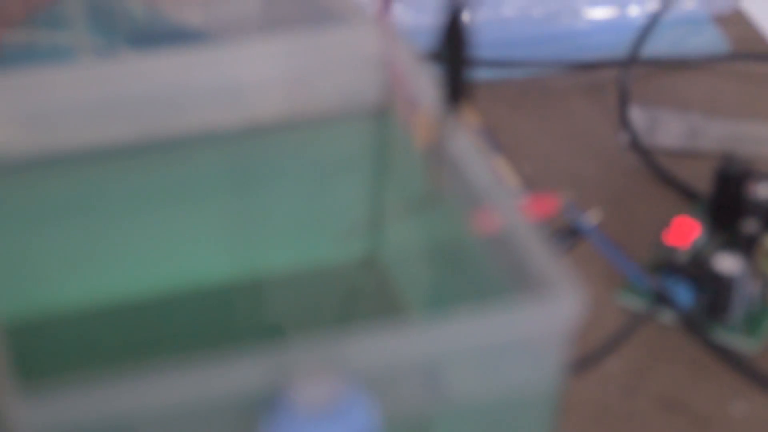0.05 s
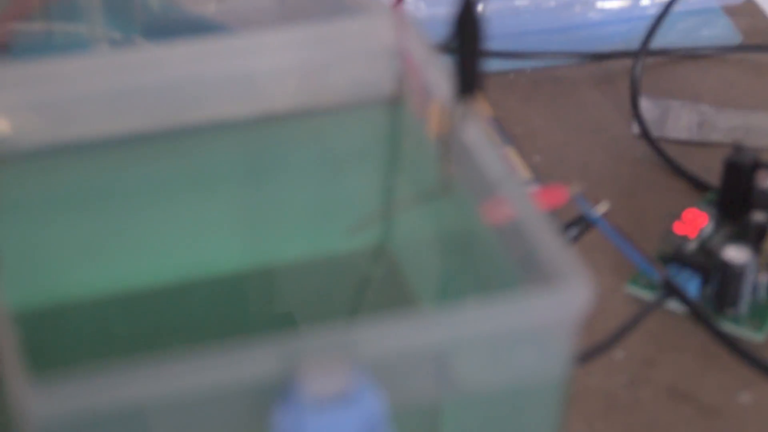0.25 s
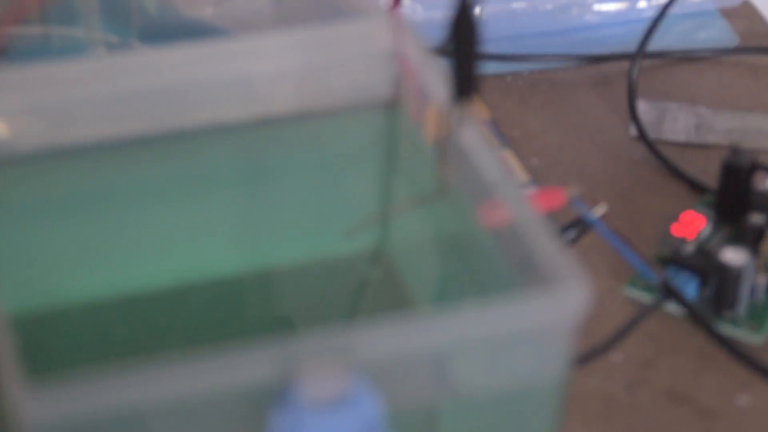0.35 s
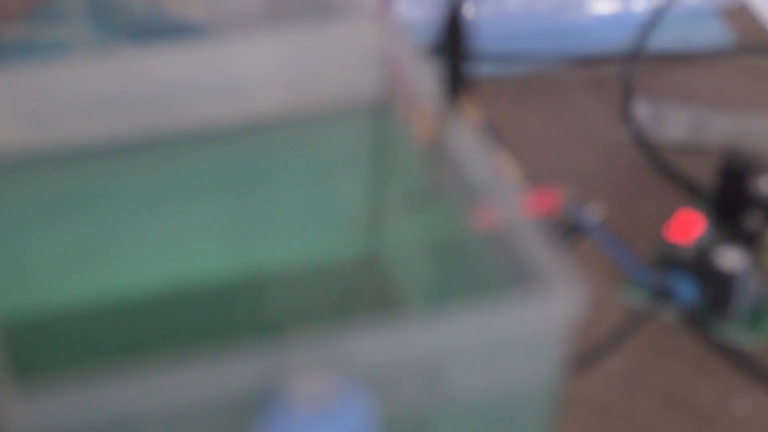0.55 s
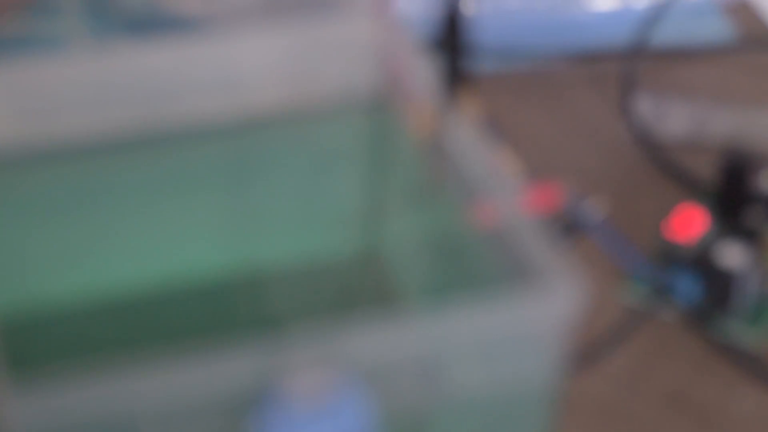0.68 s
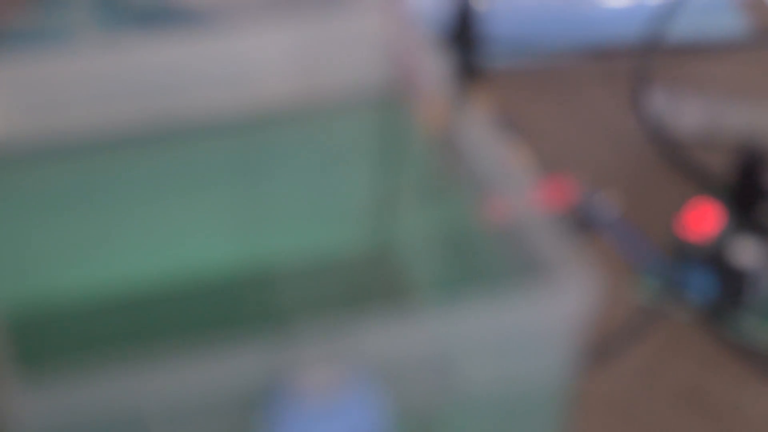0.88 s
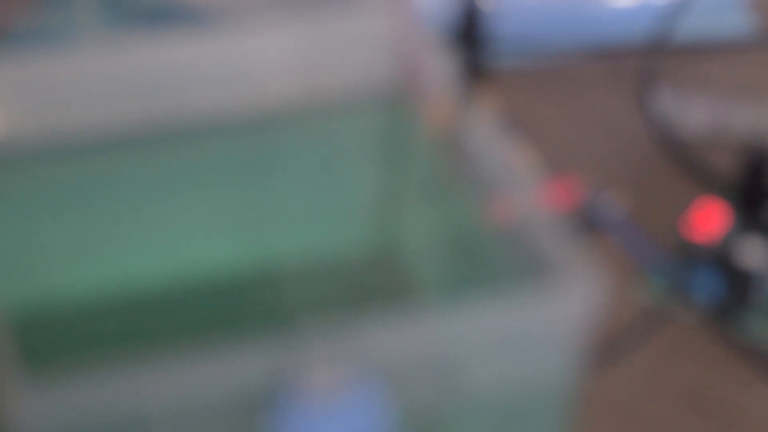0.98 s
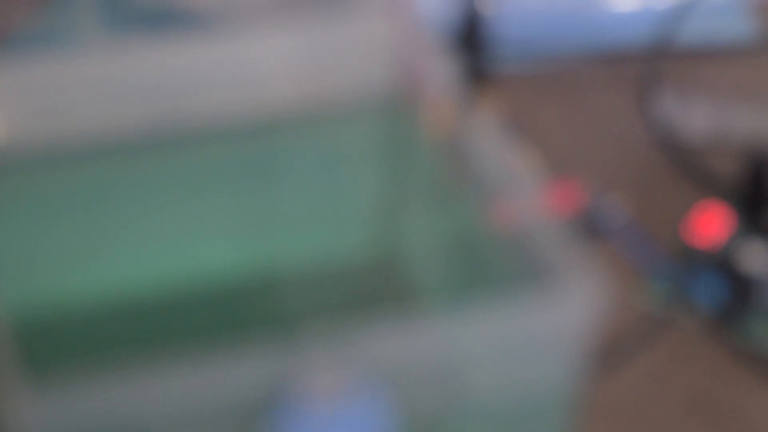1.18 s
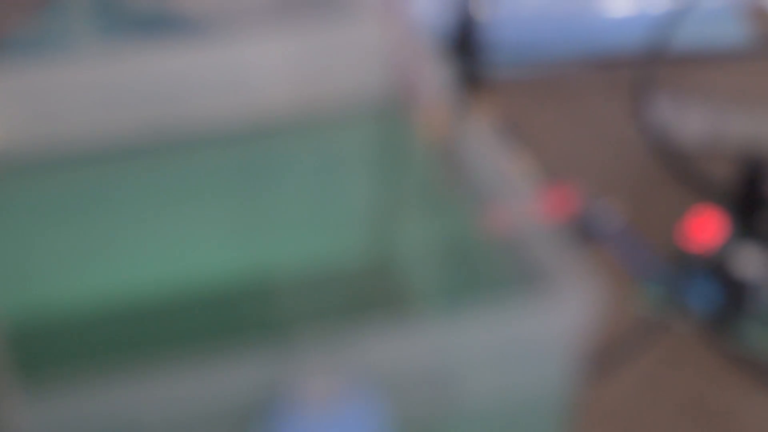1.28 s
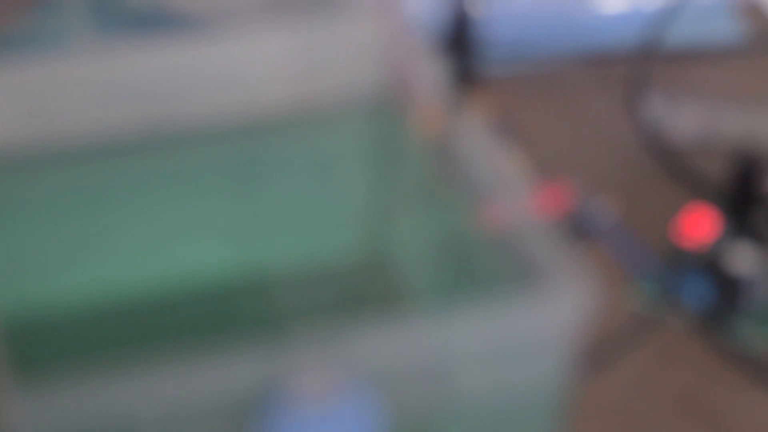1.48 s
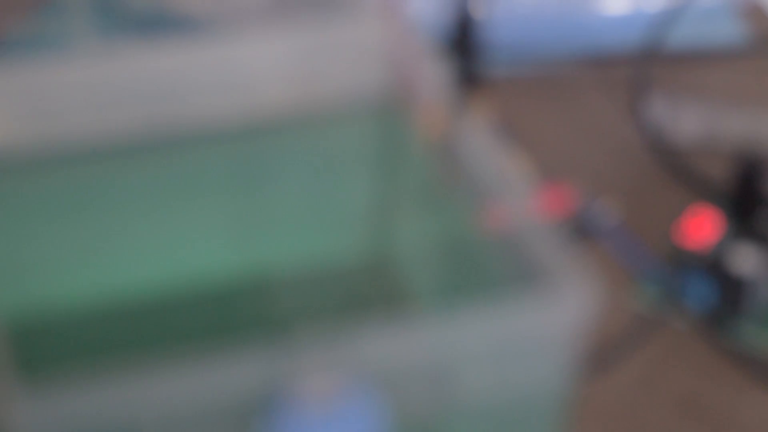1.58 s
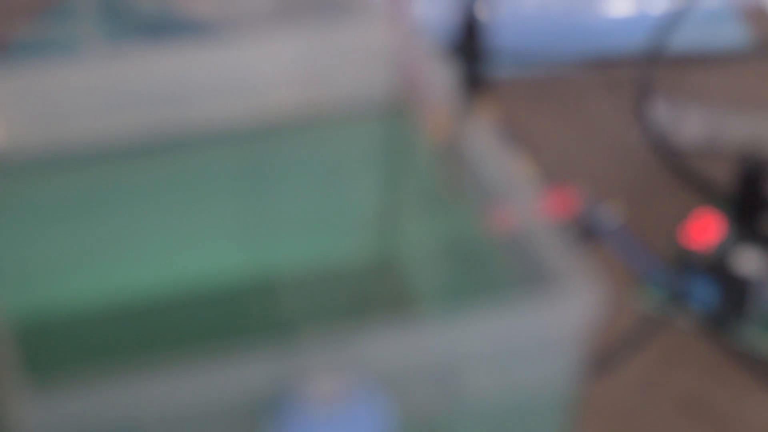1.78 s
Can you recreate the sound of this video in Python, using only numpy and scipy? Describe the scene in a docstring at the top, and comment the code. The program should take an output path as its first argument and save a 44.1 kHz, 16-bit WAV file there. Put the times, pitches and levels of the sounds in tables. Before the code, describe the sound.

A tiny autofocus motor, heard very close through the camera body. Quiet room hiss and a faint high whine first; at 0.23 s a short buzz with scrape and hard clattering clack at 0.25, leaving a thin metallic ring. From 0.37 to 1.29 s a gritty, rattling whir, briefly louder near 0.69. A short pause, a tick at 1.34, then a smoother whining return with light knocks, stopping around 1.9.

```python
"""A camera's autofocus stepper motor, heard through the body by the camera's own two microphones.
It twitches, drives out of focus for a second, stops briefly, then runs back: uneven step impulses,
screw-rub noise, rattling play and coil-whine sines. The lens group clacks, knocks, scrapes and ticks
(impulses and noise bursts) and leaves springs ringing (decaying sines). The contacts and the drive ring
one small housing (filters and a noise tail), over a quiet room (shaped noise and a thin whine)."""
import sys
import numpy as np
from scipy import signal
from scipy.fft import rfft, irfft
from scipy.io import wavfile
from scipy.ndimage import uniform_filter1d

SR = 44100
rng = np.random.default_rng(int(sys.argv[2]) if len(sys.argv) > 2 else 0)


def to_wav(s):
    """Save 16-bit WAV."""
    ch = np.atleast_2d(s).T  # columns
    pcm = np.round(np.clip(ch, -1, 1) * 32767)  # PCM
    wavfile.write(sys.argv[1], SR, pcm.astype(np.int16))


N = 81585
TIME = np.arange(N) / SR
FILTER_SIZE = 8192  # samples
FREQ = np.maximum(np.fft.rfftfreq(FILTER_SIZE, 1 / SR), 1)
LEFT_RIGHT = np.array([[1], [-1]])
CYCLE_HZ = 142.12  # one electrical cycle is four motor steps


def amp(db):
    """Decibels to gain."""
    return 10 ** (np.asarray(db) / 20)


def unit(x):
    """Scale to rms 1."""
    return x / np.sqrt(np.mean(x ** 2))


def curve(table, column=1):
    """One table column interpolated over log frequency."""
    table = np.array(table, float)
    return np.interp(np.log(FREQ), np.log(table[:, 0]), table[:, column])


def fade(t, t60_s):
    """Exponential decay from t = 0, 60 dB in t60_s, held at 1 before."""
    return np.exp(-np.log(1000) * np.maximum(t, 0) / t60_s)


def walk(hz):
    """Smooth random wander with a spread near 1, one new draw per 1/hz."""
    k = int(SR / hz)
    draws = np.repeat(rng.standard_normal(N // k + 1), k)
    return 1.3 * uniform_filter1d(uniform_filter1d(draws, k), k)[:N]


def pulses(times_s, sizes):
    """Band-limited impulses at sub-sample times (windowed sinc)."""
    out = np.zeros(N)
    at = np.asarray(times_s)[:, None] * SR
    index = at.astype(int) + np.arange(-7, 9)
    shape = np.sinc(index - at) * np.sinc((index - at) / 8)
    inside = (index >= 0) & (index < N)
    np.add.at(out, index[inside], (shape * np.asarray(sizes)[:, None])[inside])
    return out


def response(db):
    """Minimum-phase response of unit energy with this colour, via the folded cepstrum."""
    cepstrum = irfft(np.log(amp(db)))
    cepstrum[1:FILTER_SIZE // 2] *= 2
    cepstrum[FILTER_SIZE // 2 + 1:] = 0
    return np.exp(rfft(cepstrum)) / np.sqrt(np.mean(amp(db) ** 2))


# room noise colour: f/Hz, relative density/dB
ROOM_COLOUR = [(18, -58), (30, -13), (171, -8.5), (194, -4), (310, -7.5), (391, -4.5), (658, -3.5),
               (1910, -5), (2110, -14), (2350, -10), (14800, -31.5)]
ROOM_MID_DB, WHINE_HZ, WHINE_RMS_DB = -57.5, 2120, -63.5


def room(side_db=-7):
    """Soft noise, mostly common to both channels, plus a steady electronic whine."""
    colour = irfft(response(curve(ROOM_COLOUR)))
    mid, side = (signal.fftconvolve(rng.standard_normal(N + FILTER_SIZE), colour, "valid")[:N]
                 for _ in range(2))
    whine = np.sqrt(2) * amp(WHINE_RMS_DB) * np.sin(2 * np.pi * WHINE_HZ * TIME)
    return amp(ROOM_MID_DB) * (mid + amp(side_db) * side * LEFT_RIGHT) + whine


# springs left ringing: f/Hz, peak level/dB, t60/s
SPRINGS = [(422, -38.5, 0.097), (1010, -39.5, 0.48), (3735, -45.5, 0.48), (3900, -41, 0.067),
           (4480, -51, 0.45)]


def springs():
    """Small metal parts ring on as decaying sines after the hardest clack."""
    hardest_s = max(CLACKS, key=lambda row: row[1])[0]
    t = TIME - hardest_s
    ring = sum(amp(db) * fade(t, t60_s) * np.sin(2 * np.pi * hz * t) for hz, db, t60_s in SPRINGS)
    return (t > 0) * ring


# paths to the two microphones: f/Hz, left minus right/dB, left lead/rad
MIC_PATHS = [(100, 0, 0), (450, -.5, 0), (1100, -1, .3), (1650, -5, -.3), (1950, -3, 0), (2130, 6, .8),
             (2400, -12, .3), (2800, -16, .4), (3150, -6, 2.4), (3600, -2, 3.7), (3950, 13, 2.2),
             (4500, 7, -1.5), (4900, 8, -1), (5350, -6, -3.6), (5850, -7, -5.6), (6450, 0, -6.25),
             (8800, 0, -6.3), (9150, 7, -6.4), (9600, 0, -6.3)]


def housing(force, db):
    """Colour a force and carry it to both mics with level and phase differences per frequency."""
    share = amp(LEFT_RIGHT * curve(MIC_PATHS) / 2)
    lead = np.exp(1j * LEFT_RIGHT * curve(MIC_PATHS, column=2) / 2)
    paths = irfft(response(db) * lead * share / np.sqrt(np.mean(share ** 2, axis=0)))
    # centred so that phase leads are not wrapped to the end
    paths = np.roll(paths, FILTER_SIZE // 2, axis=1)
    return signal.fftconvolve(force[None], paths, axes=1)[:, FILTER_SIZE // 2:FILTER_SIZE // 2 + N]


# housing resonances: f/Hz, width/Hz, outward lift/dB, return lift/dB (lift sign ignored)
MODES = [(417.7, 19, 10.5, 13), (849, 28, 13, -2), (911, 13.3, 11.5, -2), (1064, 72, 6.5, 9.5),
         (1536, 20, 10, -1.5), (1713, 52, 9, 4.5), (2016, 87, 5.5, 4.5), (2127, 43, 10, 1.5),
         (2407, 56, 6.5, 0), (2567, 46, 9, 11.5), (3116, 58, 6, 1.5), (6313, 140, 12, 7.5),
         (6920, 140, 10, 1), (7910, 310, 9.5, 8.5), (8320, 480, 7.5, 8), (9160, 340, 16.5, 12)]


def resonances(column):
    """Summed resonance peaks of the housing modes, as lift in dB."""
    lift = 1
    for mode in MODES:
        detune = 2 * (FREQ - mode[0]) / mode[1]
        lift = lift + (amp(abs(mode[column])) ** 2 - 1) / (1 + detune ** 2)
    return 10 * np.log10(lift)


def blows(table, hit_db, chatter_db, chatter_s, lead_s):
    """Each blow: a brief swelling graze, the impact, then dying chatter."""
    times_s, db = np.array(table).T
    chatter = sum(amp(d) * fade(TIME - t, chatter_s) * fade(t - TIME, lead_s) for t, d in table)
    return amp(hit_db) * pulses(times_s, amp(db)) + amp(chatter_db) * chatter * rng.standard_normal(N)


# hard clacks of the lens group: t/s, relative level/dB
CLACKS = [(.2512, -6), (.2534, -7.5), (.2547, -0.5), (.2582, -5), (.2685, -20), (.2721, -11), (.2817, -7),
          (.285, -21), (.311, -53)]
# knocks of the slack on the way back: t/s, relative level/dB
KNOCKS = [(1.3711, -15), (1.3941, -12.5), (1.4233, -14), (1.4511, -16), (1.4733, -18), (1.501, -29),
          (1.5143, -19), (1.5283, -21), (1.5355, -21.5), (1.633, -28), (1.652, -29), (1.7378, -23),
          (1.8393, -20.5)]
# scrapes as the drive takes hold: t/s, half length/s, relative level/dB
SCRAPES = [(0.2356, 0.0031, -12.5), (0.2486, 0.0038, -11.5), (0.3781, 0.0058, -19), (0.399, .002, -29),
           (1.3402, 0.0058, -22.5)]
# sharp little ticks of the mechanism: t/s, relative level/dB
TICKS = [(.235, -29), (.2492, -52), (.2547, -14), (.3785, -19.5), (.402, -22.5), (1.341, -23.5),
         (1.3645, -26)]
# contact colour: f/Hz, then relative level/dB of outward drive, return drive, clack, knock, scrape
COLOUR = [(60, -45.5, -36, -57, -41, -46), (194, -26.5, -33, -50, -36, -42), (725, -24, -27, -31, -29, -74),
          (972, -21.5, -25.5, -16, -11, -11), (1384, -21.5, -26.5, -30, -25.5, -43),
          (1860, -11, -15.5, -16.5, -13.5, -20), (2764, -4.5, -16.5, -12, -1.5, -9),
          (3180, 0, 0, -3.5, -2.5, 3.5), (3844, -4, -13.5, -11, -3.5, -7), (4018, -1.5, -0.5, 0, 0.5, 4),
          (4550, -5.5, -21, -15, -18, -14.5), (4940, -20, -25.5, -24, -31, -46),
          (5630, -11, -18, -35, -26, -8.5), (5810, -16.5, -21, -33, -28, -14),
          (8840, -35.5, -39, -52, -51, -38), (12170, -36.5, -43.5, -48, -52, -31.5),
          (14660, -54, -65, -58, -54, -61)]


def lens():
    """Impacts and rubbing of the lens group, each contact with its own colour."""
    clacks = blows(CLACKS, hit_db=15, chatter_db=-11, chatter_s=0.028, lead_s=0.012)
    knocks = blows(KNOCKS, hit_db=18.5, chatter_db=-9, chatter_s=0.025, lead_s=0.0152)
    scrape_level = sum(amp(db) * np.exp(-((TIME - t) / half_s) ** 2) for t, half_s, db in SCRAPES)
    scrapes = rng.standard_normal(N) * scrape_level
    ticks = blows(TICKS, hit_db=9, chatter_db=-5.5, chatter_s=.015, lead_s=0.0032)
    # f/Hz, relative level/dB
    tick_colour = curve([(100, -39), (600, -17), (2000, 1.5), (6000, 17), (9000, -5.5), (13000, -0.5),
                         (15000, -33)])
    return (housing(clacks, curve(COLOUR, column=3))
            + housing(knocks, curve(COLOUR, column=4))
            + housing(scrapes, curve(COLOUR, column=5))
            + housing(ticks, tick_colour))


def running(moves, rise_s=.008):
    """Drive level: a quick linear rise, a hold, an exponential coast."""
    return sum(amp(db) * np.clip((TIME - on) / rise_s, 0, 1) * fade(TIME - off, coast_s)
               for on, off, db, coast_s in moves)


# coil whine partials: multiple of the cycle frequency
MULTIPLES = [3, 4, 6, 7, 12, 15, 17, 22, 23, 43, 45, 47, 49, 65]
# outward rms level/dB of each multiple, before flutter
COIL_OUT_DB = [-60, -69, -65, -60, -57, -45, -50, -49, -54, -60, -51, -70, -66, -65]
# return rms level/dB of each multiple, before flutter
COIL_BACK_DB = [-67, -70, -68, -72, -61, -51, -66, -52, -45, -55, -50, -65, -66, -61]
SPEED_WOBBLE, WANDER_HZ = .003, 9  # wobble: share of cycle frequency


def coils(flutter_db=1, flutter_hz=40.17):
    """Coils reversing in turn whine at cycle multiples; pitch wanders jointly, levels separately."""
    turn_rad = 2 * np.pi * np.cumsum(CYCLE_HZ * (1 + SPEED_WOBBLE * walk(WANDER_HZ))) / SR
    out, back = (running([(on, off, 0, coast_s) for on, off, _, coast_s in moves])
                 for moves in (MOVES_OUT, MOVES_BACK))
    whine = 0
    for k, out_db, back_db in zip(MULTIPLES, COIL_OUT_DB, COIL_BACK_DB):
        level = (amp(out_db) * out + amp(back_db) * back) * amp(flutter_db * walk(flutter_hz))
        whine = whine + np.sqrt(2) * level * np.sin(k * turn_rad + rng.uniform(0, 2 * np.pi))
    return housing(whine, np.zeros(len(FREQ)))


# relative strength/dB of the four steps in a cycle
STEP_DB = [-1.5, -6, -3.5, 1]
STEP_JITTER_S = .00003


def drive(moves, step_db, step_scatter_db, rub_db, rub_decay, play_db, play_scatter_db, play_s):
    """Force on the screw: uneven steps, a rub after each, loose play rattling once a cycle."""
    count = int(N / SR * CYCLE_HZ) + 1
    order = len(STEP_DB)
    chance = rng.standard_normal((count * order, 2))
    times_s = np.arange(count * order) / (CYCLE_HZ * order)
    sizes = amp(np.tile(STEP_DB, count) + step_scatter_db * chance[:, 0])
    signs = np.tile([1, 1, -1, -1], count)
    steps = pulses(times_s + STEP_JITTER_S * chance[:, 1], sizes * signs)
    phase = TIME * CYCLE_HZ * order  # in steps, as is rub_decay
    rub = rng.standard_normal(N) * sizes[phase.astype(int)] * np.exp(-(phase % 1) / rub_decay)
    loose = rng.standard_normal((count, 2))
    play = pulses(times_s[::order] + play_s * loose[:, 0], amp(play_scatter_db * np.tanh(loose[:, 1])))
    force = amp(step_db) * unit(steps) + amp(rub_db) * unit(rub) + amp(play_db) * unit(play)
    return running(moves) * unit(force)


# outward moves: start t/s, stop t/s, level/dB, coast t60/s
MOVES_OUT = [(.231, .295, -30.5, 0.08), (.372, 1.291, -31, 0.02)]
# return move: start t/s, stop t/s, level/dB, coast t60/s
MOVES_BACK = [(1.342, 1.9, -31, .035)]
TIGHT_S, TIGHT_WIDTH_S, TIGHT_DB = 0.6865, 0.015, 6  # tight spot on the screw


def motor():
    """Gritty outward drive, louder at the tight spot, then the smoother return, via the housing."""
    out = drive(MOVES_OUT, step_db=-9.5, step_scatter_db=1, rub_db=1.5, rub_decay=0.46,
                play_db=-3, play_scatter_db=5.5, play_s=.0018)
    back = drive(MOVES_BACK, step_db=-5, step_scatter_db=-1.0, rub_db=1.5, rub_decay=0.52,
                 play_db=-5, play_scatter_db=1, play_s=0.0013)
    tight = amp(TIGHT_DB * np.exp(-((TIME - TIGHT_S) / TIGHT_WIDTH_S) ** 2))
    tilt_db = curve([(4500, -0.5), (6500, -2.5), (9000, -5), (12000, 2)])  # f/Hz, level/dB
    out_db = curve(COLOUR, column=1) + resonances(column=2) + tilt_db / 2
    back_db = curve(COLOUR, column=2) + resonances(column=3) + tilt_db
    return housing(out * tight, out_db) + housing(back, back_db)


CASE_T60_S, CASE_DB, CASE_LOW_CUT_HZ = 0.03, -5, 1200


def case_ring(force):
    """Diffuse ring of the housing: convolution with decaying noise, independent per channel."""
    tail = rng.standard_normal((2, FILTER_SIZE)) * fade(TIME[:FILTER_SIZE], CASE_T60_S)
    tail /= np.sqrt(np.sum(tail ** 2, axis=1, keepdims=True))
    tail = signal.sosfilt(signal.butter(2, CASE_LOW_CUT_HZ, "high", fs=SR, output="sos"), tail)
    return amp(CASE_DB) * signal.fftconvolve(force, tail, axes=1)[:, :N]


def scene(lens_ring_db=-8):
    """The mechanism with the short diffuse ring of its case, over the room."""
    whirr, hits = motor(), lens()
    ring = case_ring(whirr + amp(lens_ring_db) * hits)
    return whirr + coils() + hits + ring + springs() + room()


LOW_CUT_HZ, TOP_HZ = 108.3, 15300


def record(dry):
    """The recorder clips at full scale, thins the bass and cuts the top."""
    clipped = np.clip(dry, -1, 1)
    thin = signal.sosfilt(signal.butter(2, LOW_CUT_HZ, "high", fs=SR, output="sos"), clipped)
    return signal.sosfilt(signal.ellip(8, .2, 70, TOP_HZ, fs=SR, output="sos"), thin)


dry = scene()
out = record(dry)
to_wav(out)
```